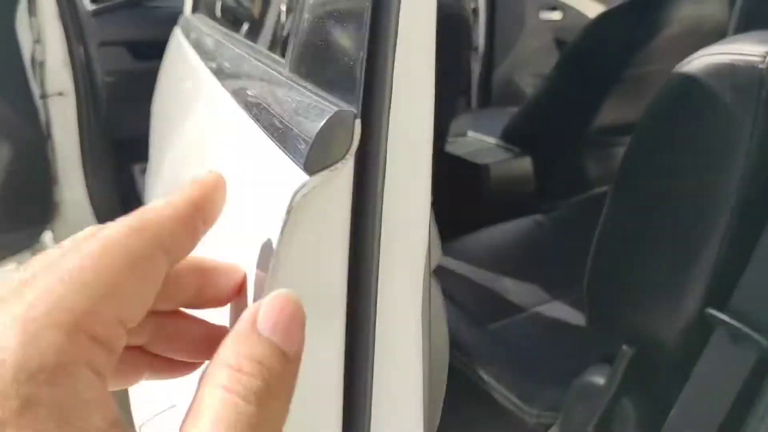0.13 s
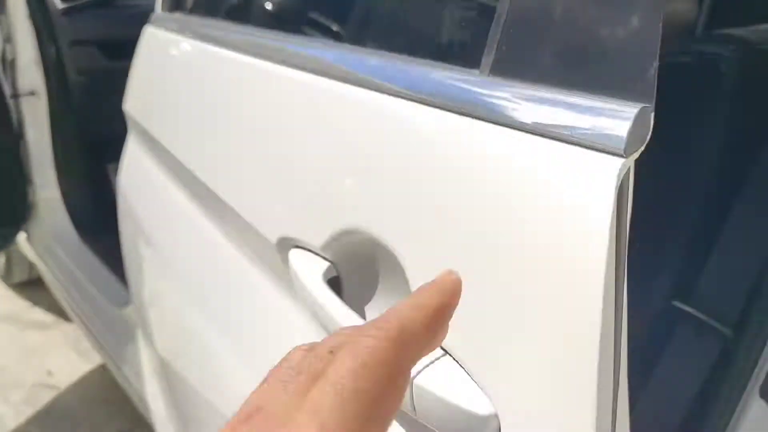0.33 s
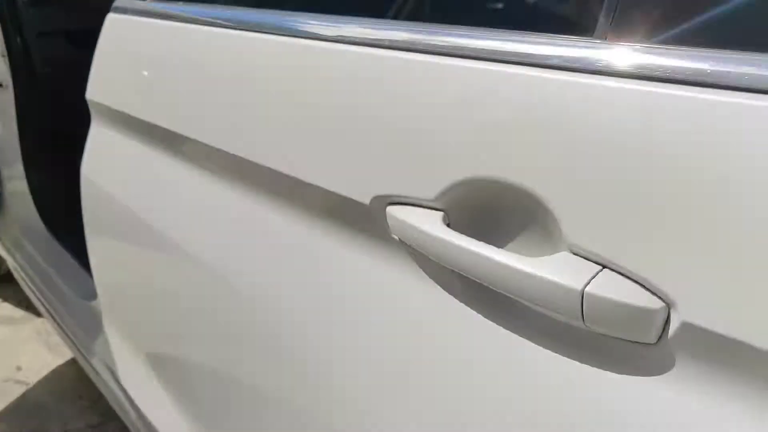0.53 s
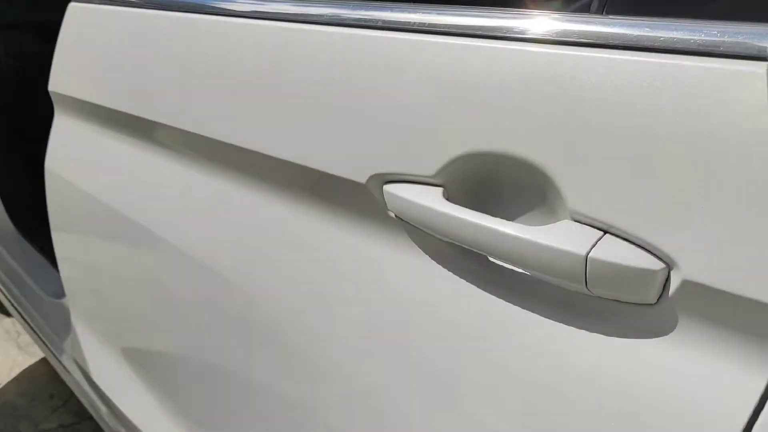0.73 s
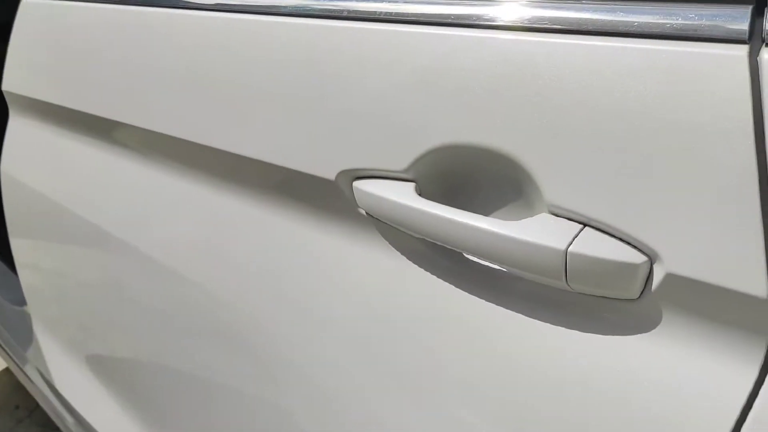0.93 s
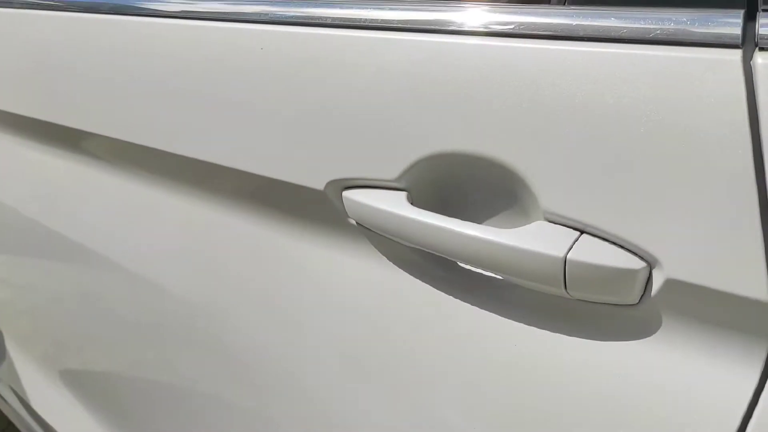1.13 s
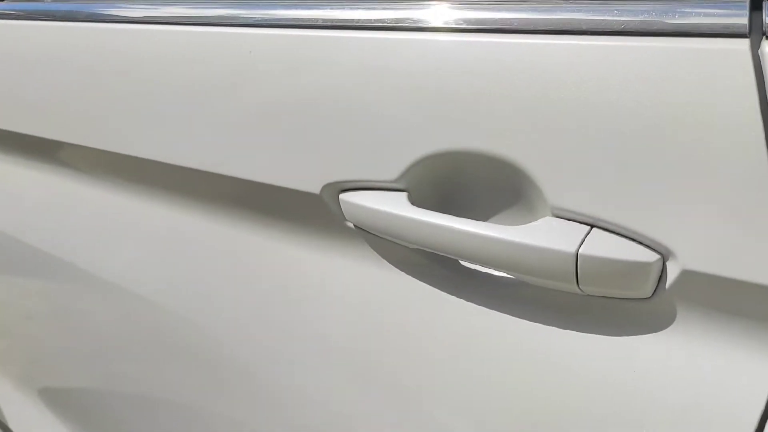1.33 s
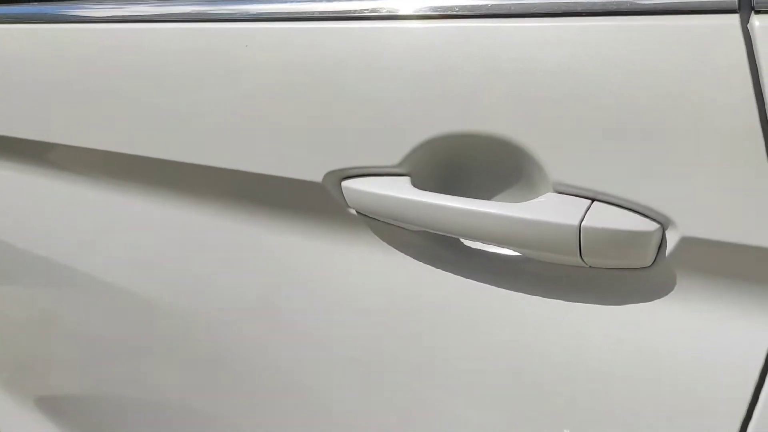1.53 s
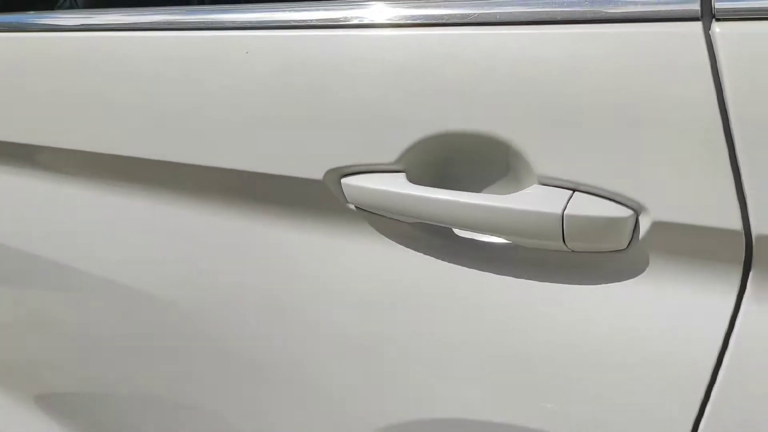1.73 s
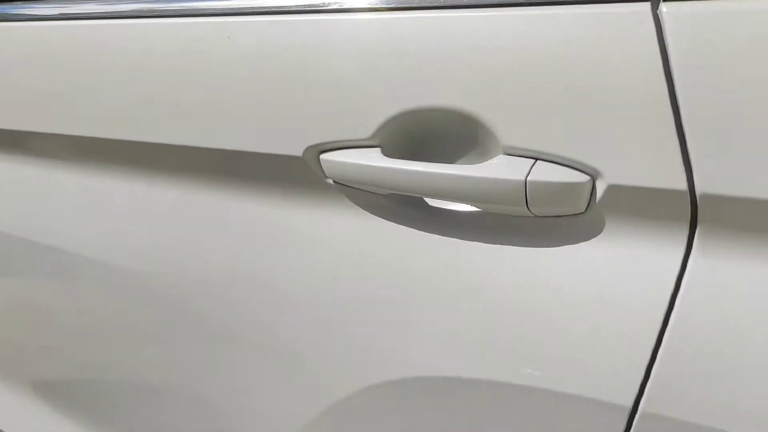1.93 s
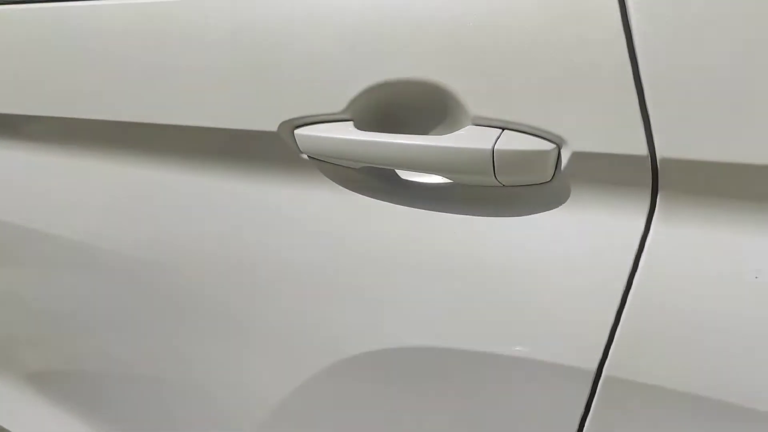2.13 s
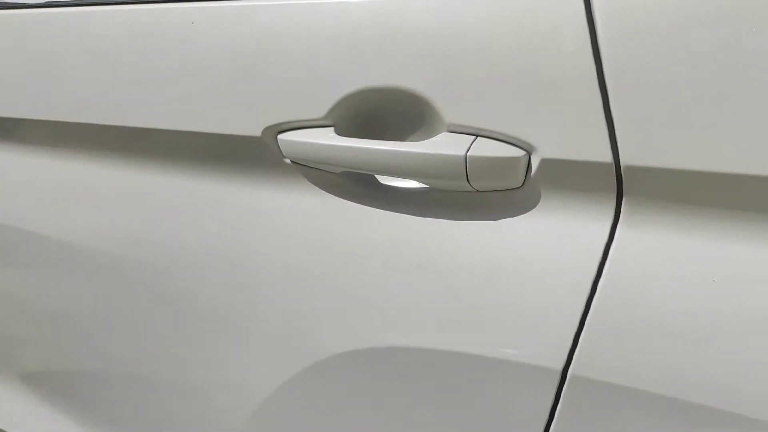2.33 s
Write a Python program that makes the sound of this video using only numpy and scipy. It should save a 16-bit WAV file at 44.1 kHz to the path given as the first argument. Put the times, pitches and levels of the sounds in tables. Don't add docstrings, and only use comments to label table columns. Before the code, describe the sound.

Single car door slam, close up, with latch click and low thump over faint traffic

```python
import sys
import numpy as np
from scipy import signal
from scipy.fft import rfft, irfft, next_fast_len
from scipy.io import wavfile

SR = 44100
rng = np.random.default_rng(int(sys.argv[2]) if len(sys.argv) > 2 else 0)


def voltage_ratio(level):
    return 10 ** (np.asarray(level, float) / 20)


def to_wav(s):
    ch = np.atleast_2d(s).T
    pcm = np.round(np.clip(ch, -1, 1) * 32767)
    wavfile.write(sys.argv[1], SR, pcm.astype(np.int16))


N = 109853

# frequency in Hz, density in dB per Hz.
RUMBLE_SPECTRUM = [(13, -38), (22, -21), (80, -7.5), (108, -11), (141, -8.5), (301, -15), (340, -18.5),
                   (476, -23.5), (1500, -39), (1950, -79), (3300, -120)]
# frequency in Hz, density in dB per Hz.
WASH_SPECTRUM = [(550, -12), (950, -6.5), (1700, -10), (2450, -4.5), (3100, -7), (5400, -10.5), (7550, -7),
                 (9200, -12.5)]
# frequency in Hz, density in dB per Hz.
VEHICLE_SPECTRUM = [(24, -39), (40, -15), (160, -2.5), (297, -12), (499, -8.5), (750, -18.5), (1020, -19.5),
                    (2420, -32), (3110, -32), (4000, -30.5), (5200, -40), (8800, -120)]
# time in seconds, level in dB, brightness in dB per octave above its drone.
VEHICLE_PASS = [(0, -49, 1.5), (.3, -38.5, -2.5), (.62, -50, 2), (1.35, -82, 16), (1.56, -37, -4.5),
                (1.69, -31, -8.5), (1.72, -32.5, -5), (1.8, -33.5, 1.5), (1.9, -27.5, -3.5),
                (2.05, -32, -2.5), (2.28, -33, -1), (2.33, -46, 2), (2.49, -44.5, 2.5)]
# frequency in Hz, share heard by both ports.
LOT_SHARED = [(60, 0.91), (250, 0.96), (600, 0.2), (1500, 0.52), (3200, 0.57), (5300, 0.05), (9000, 0.15)]
# frequency in Hz, width in Hz, level in dB, change after the shift in dB.
WHINE_BANDS = [
    (1400, 13, -63.5, -17),
    (1914, 74, -53.5, -4),
    (2389, 40, -57.5, 3),
]
# start in seconds, level in dB, length in ms, centre in Hz, width in octaves.
SCUFF_STROKES = [
    (.0600, -38, 2.0, 8000, .5),
    (2.080, -32, 52, 2600, .8),
    (2.105, -35.5, 34, 8000, .9),
    (2.40, -36.5, 95, 2100, 1.0),
    (2.140, -37.5, 85, 5000, 2.0),
    (2.39, -41, 110, 6000, 1.5),
    (0.000, -35, 20, 7500, 1.2),
]
# frequency in Hz, share heard by both ports.
GRIT_SHARED = [(500, 0.25), (3000, 0.69), (8000, 0.23)]
# start in seconds, level in dB, rise in ms, T60 in seconds.
RATTLE_BURSTS = [
    (.6490, -32.5, .5, .03),
    (0.6658, -17, 0.6, 0.049),
    (0.675, -25.5, 1.9, 0.19),
    (0.782, -42, 1.2, 0.024),
]
# frequency in Hz, density in dB per Hz.
RATTLE_SPECTRUM = [(710, -55), (1200, -1), (1570, -32), (2230, -8.5), (3610, -13.5), (4480, -14),
                   (6550, -14.5), (7580, -10), (9400, -11.5), (12200, -52), (20700, -120)]
# frequency in Hz, density in dB per Hz.
PANEL_SPECTRUM = [(76, -15), (130, -10), (221, -6.5), (330, -7), (466, -16), (1090, -8), (1360, -23),
                  (1740, -11.5), (4000, -50), (5200, -67), (8800, -120)]
# frequency in Hz, T60 in seconds.
PANEL_T60_S = [(80, .85), (250, .5), (500, .32), (900, .4), (1500, .18), (3000, .1)]
# frequency in Hz, share heard by both ports.
DOOR_SHARED = [(100, 0.95), (600, 0.48), (1200, 0.16), (2000, 0.27), (8000, 0.057)]
# start in seconds, frequency in Hz, peak in dB, rise in ms, T60 in seconds.
LATCH_MODES = [(.65052, 920, -18, 4.0, .015), (.66592, 1010, -20, 4.0, .02), (.6525, 780, -22, 4.0, .05),
               (.66988, 1010, -7.5, 3.0, .010), (.6800, 800, -24, 5.0, .045), (.6500, 1500, -34, 1.5, .03),
               (.6660, 790, -23, 3.0, .09), (.6690, 1190, -29, 3.0, .05), (.6760, 1540, -27, 3.0, .07),
               (.6690, 1790, -29, 3.0, .07), (.6662, 7750, -31, .6, .07), (.6662, 8090, -35, .6, .07),
               (.6720, 550, -29, 4.0, .1), (.6700, 460, -29, 5.0, .1), (.6830, 950, -27, 4.0, .12),
               (.6950, 1060, -30, 5.0, .12)]
# time in seconds, frequency in Hz, level in dB.
LATCH_KNOCKS = [(0.651, 6200, -35), (0.6675, 1950, -33), (0.6678, 7840, -20), (0.6679, 9280, -21),
                (0.671, 4220, -19.5), (0.6712, 2600, -22), (0.6728, 7900, -25), (0.6747, 4500, -25),
                (0.6775, 3300, -35), (0.6788, 7700, -22), (0.6794, 4700, -25), (0.681, 1620, -25),
                (0.682, 2740, -27), (0.6844, 7410, -25), (0.6872, 4330, -22), (0.6901, 5170, -24),
                (0.6908, 7900, -23), (0.694, 7700, -27), (0.6952, 5340, -38)]
# start in seconds, frequency in Hz, peak in dB, rise in ms, T60 in seconds.
SKIN_MODES = [(.6565, 290, -21, 3.0, .045), (.6686, 303, -19.5, 10.0, .12), (.6700, 240, -24, 8.0, .12),
              (.6700, 400, -28, 6.0, .1), (.6894, 156, -16, 12.0, .055), (.6740, 85, -23, 6.0, .2),
              (.6560, 430, -26, 3.0, .04), (.7360, 185, -28, 6.0, .08), (.7950, 148, -29, 15.0, .2),
              (.6884, 303, -24, 6.0, .09), (.6900, 410, -26, 5.0, .08), (.6620, 480, -29, 3.0, .05)]
# start in seconds, frequency in Hz, peak in dB, rise in ms, T60 in seconds.
CABIN_MODES = [
    (.6720, 29, -19, 5.0, .2),
    (.7405, 38.5, -26, 16.0, .5),
]
# start in seconds, frequency in Hz, peak in dB, rise in ms, T60 in seconds.
JOINT_MODES = [
    (1.518, 95, -28, 5.0, .12),
    (1.76, 100, -27, 12.0, .25),
    (1.79, 430, -35, 6.0, .12),
    (1.727, 520, -32, 2.0, .12),
    (1.729, 640, -35, 2.0, .1),
    (1.742, 740, -36, 6.0, .15),
    (1.705, 380, -34, 6.0, .1),
]
# start in seconds, frequency in Hz, peak in dB, rise in ms, T60 in seconds.
HEEL_MODES = [
    (2.078, 119, -20, 4.6, 0.068),
    (2.135, 293.4, -33.5, 16, 0.62),
]
# time in seconds, frequency in Hz, level in dB.
STONE_CRACKS = [(2.0902, 4900, -36), (2.0904, 6300, -41), (2.0918, 8900, -40), (2.0986, 3300, -35),
                (2.1041, 2780, -33), (2.1069, 2240, -29), (2.1109, 2070, -28), (2.1111, 5170, -42),
                (2.1137, 6370, -39), (2.1141, 8610, -35), (2.1212, 7000, -37), (2.1224, 8700, -44),
                (2.1277, 8100, -32), (2.1282, 2410, -32), (2.1319, 2410, -30), (2.132, 6720, -33),
                (2.1569, 6900, -45), (2.157, 8800, -37), (2.1574, 2230, -34), (2.159, 1290, -32.5),
                (2.1612, 8900, -40), (2.1759, 6250, -34), (2.176, 2300, -33), (2.179, 3100, -33),
                (2.179, 8050, -35), (2.1804, 6200, -40), (2.198, 6370, -33), (2.1982, 2290, -27.5),
                (2.199, 3170, -29), (2.2025, 1960, -32), (2.2053, 5800, -38), (2.3939, 8270, -38),
                (2.3941, 1890, -33), (2.3976, 8610, -38), (2.415, 1990, -40), (2.4209, 1750, -45),
                (2.4243, 2580, -44.5), (2.4303, 1910, -29), (2.4305, 8900, -42), (2.4346, 8790, -41),
                (2.439, 4850, -37), (2.4409, 2740, -50), (2.4433, 5000, -35), (2.4494, 8960, -39),
                (2.4518, 7060, -37), (2.452, 4310, -47), (2.4556, 4310, -46), (2.4575, 2050, -36),
                (2.4598, 5000, -49), (2.466, 2500, -54), (2.488, 2230, -52)]
# frequency in Hz, difference in dB.
PORT_BALANCE = [(60, 2), (250, 4), (1800, 4), (2800, 1.5), (5500, .5), (7500, -8), (8900, 5), (10500, 2)]
# frequency in Hz, gain in dB.
TOP_GAIN = [(9300, 1), (9750, -18.5), (11200, -21), (13000, -25), (14000, -32), (14700, -55), (16000, -57)]

T_S = np.arange(N) / SR
LOT_LAG_S, GRIT_LAG_S, DOOR_LAG_S = 0.0004737, -0.000097, -0.00017
SHIFT_S = 1.8


def unit_rms(x):
    return x / np.sqrt(np.mean(x ** 2) + 1e-20)


def at_hz(points, hz):
    table = np.array(points)
    return np.interp(np.log(hz), np.log(table[:, 0]), table[:, 1])


def drift(rate_hz):
    step = 40
    r = np.exp(-2 * np.pi * step * rate_hz / SR)
    slow = signal.lfilter([1], [1, -2 * r, r * r], rng.standard_normal(N // step + 2002))[2000:]
    return np.interp(np.arange(N) / step, np.arange(len(slow)), unit_rms(slow - slow.mean()))


def swell(start_s, rise_ms, t60_s):
    t = np.maximum(T_S - start_s, 0)
    shape = (1 - np.exp(-t / (rise_ms / 1000))) ** 2 * voltage_ratio(-60 * t / t60_s)
    return shape / shape.max()


def late(x, lag_s):
    size = x.shape[-1]
    turn = np.exp(-2j * np.pi * np.arange(size // 2 + 1) / size * lag_s * SR)
    return np.stack([irfft(rfft(x) * turn, size), x], axis=-2)


def rings(rows):
    return sum(voltage_ratio(db) * swell(start_s, rise_ms, t60_s) * np.sin(2 * np.pi * hz * (T_S - start_s))
               for start_s, hz, db, rise_ms, t60_s in rows)


def ticks(rows, gain_db, t60_s):
    lead_s, rise_ms = .0006, .3
    sides = np.array([[1], [-1]]) * np.pi / 4
    out = 0
    for k, (start_s, hz, db) in enumerate(rows):
        ring = np.sin(2 * np.pi * hz * (T_S - start_s) + (-1) ** k * sides)
        out = out + voltage_ratio(db + gain_db) * swell(start_s - lead_s, rise_ms, t60_s) * ring
    return out


def noise():
    return rng.standard_normal((2, 3, N))


def grains(per_s, uneven_db):
    sizes = voltage_ratio(uneven_db * np.minimum(rng.exponential(1, (2, 3, N)), 5))
    sizes = sizes * rng.choice([-1, 1], (2, 3, N))
    return unit_rms(sizes * (rng.random((2, 3, N)) < per_s / SR)) + 1e-9


def bands(source, spectrum, shared, lag_s, patchy_db=0, shape=None):
    source = np.concatenate([late(source[:, 0], lag_s), source[:, 1:]], axis=1)
    source = np.concatenate([source[..., -6000:], source], axis=2)
    edges_hz = 20 * 2 ** np.arange(0, 9.8, 1 / 3)
    together = drift(2.5)
    out, power = 0, 0
    for k, (low, high) in enumerate(zip(edges_hz, edges_hz[1:])):
        hz = np.sqrt(low * high)
        sos = signal.butter(2, [low, high], "band", fs=SR, output="sos")
        band = signal.sosfilt(sos, source[k % 2])[:, -N:]
        share = np.clip(at_hz(shared, hz), 0, 1)
        gain = voltage_ratio(at_hz(spectrum, min(hz, 9200)))
        power += gain ** 2 * (high - low) / (SR / 2)
        band = np.sqrt(share) * band[:2] + np.sqrt(1 - share) * band[2:]
        flicker = voltage_ratio(patchy_db * (0.067 * together + drift(7.1)))
        out = out + band * gain * flicker * (1 if shape is None else shape(hz))
    return out / np.sqrt(power)


def far_traffic():
    return voltage_ratio(-36.5) * bands(noise(), RUMBLE_SPECTRUM, LOT_SHARED, LOT_LAG_S, patchy_db=1.5)


def city_wash():
    later = np.clip((T_S - SHIFT_S) * 3 + 1, 0, 1)

    def brightening(hz):
        return voltage_ratio(2 * (hz > 5000) * later)

    return voltage_ratio(-46) * bands(noise(), WASH_SPECTRUM, LOT_SHARED, LOT_LAG_S, patchy_db=0.7, shape=brightening)


def passing_vehicle():
    drone_hz = 174
    time_s, *controls = np.transpose(VEHICLE_PASS)
    level_db, bright_db = (np.interp(T_S, time_s, c) for c in controls)

    def passing(hz):
        return voltage_ratio(level_db + bright_db * np.clip(np.log2(hz / drone_hz), 0, 2))

    return bands(noise(), VEHICLE_SPECTRUM, LOT_SHARED, LOT_LAG_S, patchy_db=2.5, shape=passing)


def machine_whine():
    out = 0
    for hz, width_hz, db, change_db in WHINE_BANDS:
        level_db = db + change_db * np.clip((T_S - SHIFT_S) * 10, 0, 1)
        r = np.exp(-np.pi * width_hz / SR)
        poles = [1, -2 * r * np.cos(2 * np.pi * hz / SR), r * r]
        narrow = signal.lfilter([1, 0, -1], poles, rng.standard_normal((3, N)))
        both, left, right = signal.lfilter([1], poles, narrow)
        tone = 0.47 * late(both, LOT_LAG_S) + 1.05 * np.array([left, right])
        out = out + voltage_ratio(level_db + 1.5 * drift(3.0)) * unit_rms(tone)
    return out


def shoe_scuffs():
    grit = grains(per_s=2200, uneven_db=4.5)
    snaps, strokes = [], []
    for start_s, _, length_ms, _, _ in SCUFF_STROKES:
        length_s = length_ms / 1000
        rise_s = .2 * length_s
        snaps.append(int((start_s + rise_s) * SR))
        rise = np.clip((T_S - start_s) / rise_s, 0, 1)
        strokes.append(rise * np.exp(-(np.maximum(T_S - start_s, 0) / length_s) ** 2))
    grit = grit + voltage_ratio(21) * np.isin(np.arange(N), snaps)

    def shape(hz):
        return sum(voltage_ratio(db - 6 * (np.log2(hz / mid_hz) / wide_oct) ** 2) * stroke
                   for (_, db, _, mid_hz, wide_oct), stroke in zip(SCUFF_STROKES, strokes))

    return bands(grit, [(300, -12), (1500, 0), (9000, -5)], GRIT_SHARED, GRIT_LAG_S, shape=shape)


def trim_rattle():
    shaking = sum(voltage_ratio(db) * swell(start_s, rise_ms, t60_s) for start_s, db, rise_ms, t60_s in RATTLE_BURSTS)
    clicks = grains(per_s=8000, uneven_db=2.5)
    return bands(clicks * shaking, RATTLE_SPECTRUM, DOOR_SHARED, DOOR_LAG_S)


def panel_hum():
    catch = voltage_ratio(-6) * swell(.6495, 4.0, .07)

    def shape(hz):
        return swell(.672, 1.4, at_hz(PANEL_T60_S, hz)) + catch

    return voltage_ratio(-21) * bands(noise(), PANEL_SPECTRUM, DOOR_SHARED, DOOR_LAG_S, shape=shape)


def latch():
    return late(rings(LATCH_MODES), DOOR_LAG_S) + ticks(LATCH_KNOCKS, gain_db=2.5, t60_s=0.0058)


def door_skin():
    return rings(SKIN_MODES)


def cabin_thump():
    return rings(CABIN_MODES)


def road_joints():
    return late(rings(JOINT_MODES), LOT_LAG_S)


def heel():
    return rings(HEEL_MODES)


def stones():
    return ticks(STONE_CRACKS, gain_db=3, t60_s=.0045)


def scene():
    background = far_traffic() + city_wash() + passing_vehicle() + machine_whine()
    door = trim_rattle() + panel_hum() + latch() + door_skin() + cabin_thump()
    steps = shoe_scuffs() + heel() + stones()
    return background + door + road_joints() + steps


def roll_off(x):
    return signal.sosfilt(signal.butter(12, 16300, fs=SR, output="sos"), x)


def record(dry):
    size = next_fast_len(N + 4096)
    hz = np.maximum(np.arange(size // 2 + 1) * SR / size, 1)
    gain = voltage_ratio(at_hz(TOP_GAIN, hz) + np.outer([.5, -.5], at_hz(PORT_BALANCE, hz)))
    mix = irfft(rfft(dry, size) * gain, size)[:, :N]
    return roll_off(mix)


dry = scene()
out = record(dry)
to_wav(out)
```